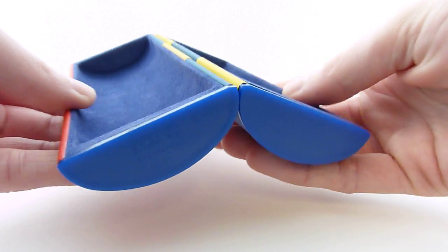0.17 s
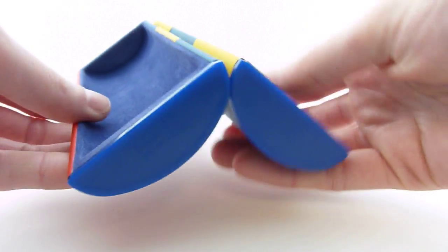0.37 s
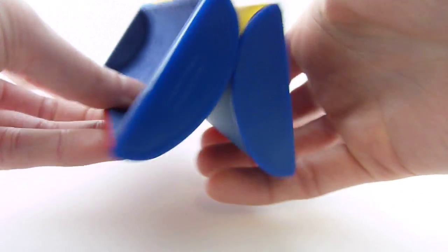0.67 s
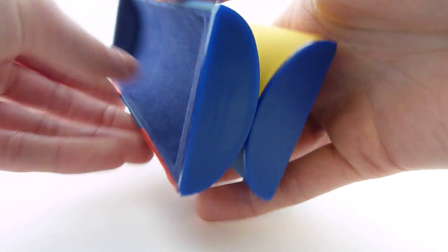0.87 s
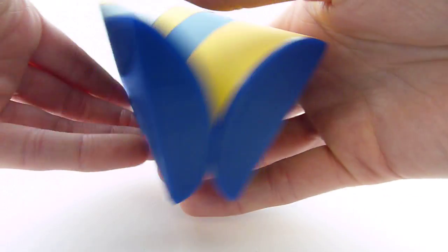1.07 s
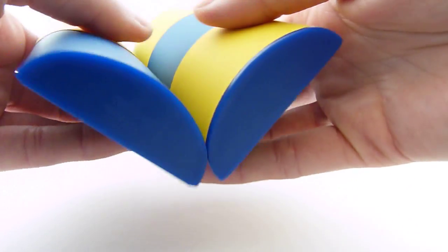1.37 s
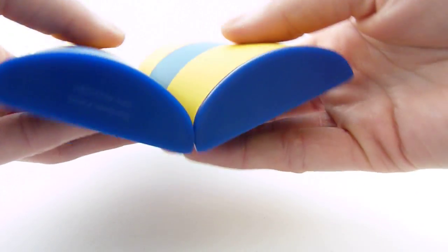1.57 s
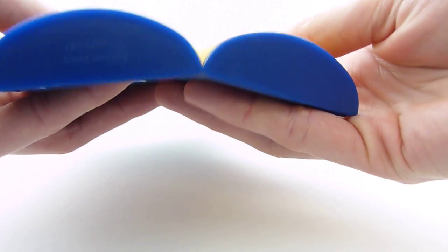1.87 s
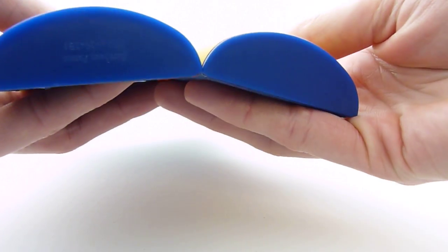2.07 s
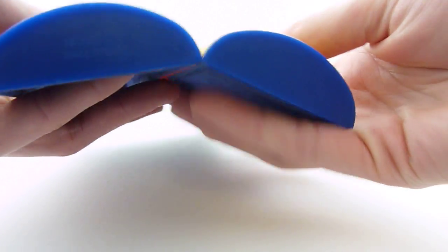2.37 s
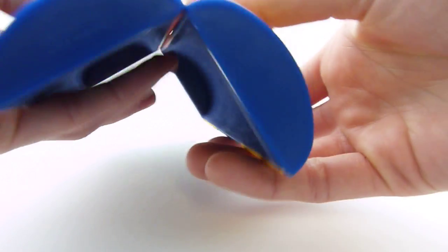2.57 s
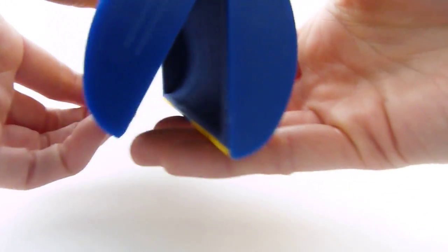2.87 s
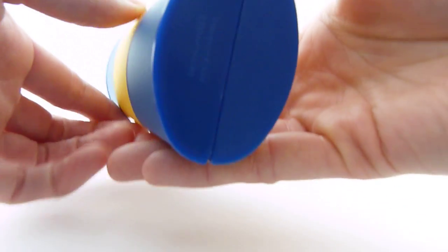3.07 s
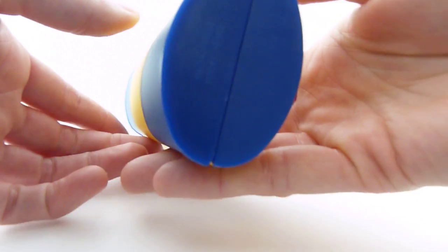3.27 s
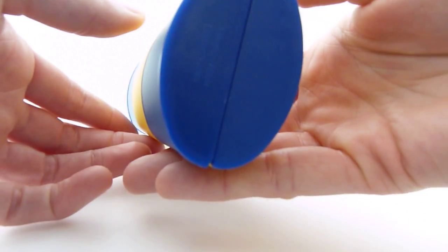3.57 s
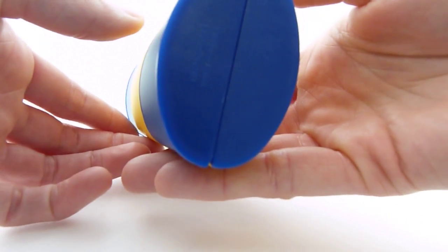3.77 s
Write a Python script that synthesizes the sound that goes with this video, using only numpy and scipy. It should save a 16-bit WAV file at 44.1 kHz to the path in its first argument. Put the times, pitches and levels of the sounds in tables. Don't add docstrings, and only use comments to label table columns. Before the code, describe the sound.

A plastic glasses case snaps shut, loud and close, after soft rubs and ticks over faint traffic rumble.

```python
import sys
import numpy as np
from scipy import signal
from scipy.fft import rfft, irfft
from scipy.io import wavfile

SR = 44100
rng = np.random.default_rng(int(sys.argv[2]) if len(sys.argv) > 2 else 0)


def digitize_waveform(pressure):
    field = np.atleast_2d(pressure).T
    bounded = np.clip(field, -1, 1)
    quanta = np.round(bounded * 32767).astype(np.int16)
    wavfile.write(sys.argv[1], SR, quanta)


def gain_from_db(level_db):
    decades = np.asarray(level_db, float) / 20
    return 10 ** decades


N = 172872

# time in seconds, peak level in dB.
SNAP_CONTACTS = [
    (3.0810, 2.5),
    (3.0825, -21),
    (3.0839, -16),
    (3.0868, -22.5),
]
SHUT_S = SNAP_CONTACTS[0][0]
KNOCK_S = 2.856


def at_hz(points, hz, column=1):
    p = np.array(points)
    return np.interp(np.log(np.maximum(hz, 1)), np.log(p[:, 0]), p[:, column])


def resonance(hz, centre_hz, width_hz):
    return 1 / (1 + ((hz - centre_hz) / width_hz * 2) ** 2)


def rms_one(x):
    return x / np.sqrt(np.mean(x ** 2) + 1e-20)


def drift(rate_hz):
    r = np.exp(-2 * np.pi * rate_hz / SR)
    noise = rng.standard_normal(N + SR)
    return rms_one(signal.lfilter([1], [1, -2 * r, r * r], noise)[SR:])


def ring(x, hz, t60):
    r = gain_from_db(-60 / (t60 * SR))
    w = 2 * np.pi * hz / SR
    return signal.lfilter([0, np.sin(w)], [1, -2 * r * np.cos(w), r * r], x + 1e-18)


def click(s, db):
    x = np.zeros(N)
    x[int(s * SR)] = gain_from_db(db)
    return x


def decay(s, t60):
    t = np.arange(N) / SR - s
    return (t >= 0) * gain_from_db(-60 * np.maximum(t, 0) / t60)


def swell(s, length):
    progress = np.clip((np.arange(N) / SR - s) / (1.3 * length), 0, 1)
    return np.sin(np.pi * progress ** .7) ** 2


def diffuse(gain_of_hz, size):
    # frequency in Hz, side against mid in dB.
    side_db = [(60, -11), (120, -29.5), (240, -25.5), (490, -23), (1000, -13), (2010, -6), (4060, -1),
               (8200, -3.5)]
    hz = np.fft.rfftfreq(size, 1 / SR)
    mid, side = rfft(rng.standard_normal((2, size))) * gain_of_hz(hz)
    side = side * gain_from_db(at_hz(side_db, hz))
    return irfft(np.array([mid + side, mid - side]), size)


def air():
    # frequency in Hz, density in dB per Hz.
    tone_db = [(22, -11.5), (36, -28), (60, 3.5), (130, 1.5), (330, -9.5), (1300, -18), (3300, -28.5),
               (7000, -42.5)]
    # frequency in Hz, width in Hz, boost in dB.
    humps = [(365, 20, 5.5), (625, 76, 6.5), (845, 27, 6), (1350, 300, 2), (6300, 1700, 6)]

    def colour(hz):
        boost = sum(db * resonance(hz, f, width) for f, width, db in humps)
        return gain_from_db(at_hz(tone_db, hz) + boost) * (hz > 12)

    return gain_from_db(-41) * rms_one(diffuse(colour, N))


def drones():
    # frequency in Hz, t60 of the ring in seconds, level in dB.
    resonances = [(54.6, 0.3, -47.5), (78.9, 0.45, -56), (95.6, 0.44, -63), (113.6, 0.55, -66.5),
                  (331.5, 0.13, -54.5)]
    out = 0
    for hz, t60, db in resonances:
        noise = rng.standard_normal(N + SR)
        hum = ring(ring(noise, hz, t60), hz, t60)[SR:]
        out = out + gain_from_db(db) * rms_one(hum)
    return out


def engine():
    # time in seconds, firing rate in Hz, level in dB.
    pull = [(1.3, 62, -38.5), (1.45, 65.3, -35.5), (1.55, 70.5, -31), (1.68, 73.4, -49), (1.93, 77.7, -33),
            (2.2, 84.8, -37), (2.43, 85.9, -34.5), (2.6, 84.6, -43), (2.7, 93.8, -66)]
    cruise = [(2.402, 76, -51.5), (2.552, 69.1, -35.5), (2.76, 67.1, -33), (3.001, 67.77, -30.5),
              (3.25, 70.4, -34), (3.44, 66.7, -35.5), (3.52, 63.3, -66)]
    # multiple of the firing rate, level in dB.
    orders = [(1, -2.5), (2, -17.5), (4, -19.5)]
    out, t = 0, np.arange(N) / SR
    for rows in (pull, cruise):
        s, hz, db = np.transpose(rows)
        phase = 2 * np.pi * np.cumsum(np.interp(t, s, hz)) / SR
        for order, order_db in orders:
            level_db = np.interp(t, s, db) + order_db + 1.5 * drift(6.0)
            out = out + np.sqrt(2) * gain_from_db(level_db) * np.sin(order * phase)
    return out


def room(x):
    # frequency in Hz, t60 in seconds, level in dB.
    bands = [(343, 0.58, -41.5), (606, 0.97, -49), (863, 0.54, -33), (1370, 0.69, -29), (2170, 0.6, -33.5),
             (3380, 0.74, -42), (5200, 0.83, -47.5), (6460, 0.61, -54)]
    size, rise_s = SR, 0.0044
    response, t = 0, np.arange(size) / SR
    build_up = 1 - np.exp(-(t / rise_s) ** 2)
    for hz, t60, db in bands:
        band = rms_one(diffuse(lambda f: np.exp(-(np.log2(np.maximum(f, 1) / hz) / .4) ** 2), size))
        response = response + gain_from_db(db - 60 * t / t60) * band * build_up
    return signal.fftconvolve(x[None], response, axes=1)[:, :N]


def rubs():
    # start in seconds, length in seconds, level in dB.
    slides = [(.2, 0.082, -65), (1.017, 0.038, -62), (1.133, 0.074, -60.5), (1.27, 0.12, -63),
              (1.482, 0.14, -52), (1.572, 0.16, -56), (1.718, 0.086, -60.5), (2.313, 0.2, -54.5),
              (2.471, 0.17, -55.5), (2.57, 0.21, -59)]
    # start in seconds, length in seconds, frequency in Hz, level in dB.
    squeaks = [
        (0.692, 0.033, 3450, -59),
        (1.265, .07, 3450, -60.5),
    ]
    hiss = rms_one(diffuse(lambda hz: resonance(hz, 6700, 2200) + gain_from_db(-4) * resonance(hz, 3300, 3000), N))
    grain = gain_from_db(1.5 * drift(60.0))
    out = hiss * grain * sum(gain_from_db(db) * swell(s, length) for s, length, db in slides)
    for s, length, hz, db in squeaks:
        squeal = rms_one(ring(rng.standard_normal(N), hz, 0.013))
        out = out + gain_from_db(db) * swell(s, length) * squeal
    return out


def ticks():
    # time in seconds, peak in dB, ring in Hz, ring t60 in seconds, crack level in dB.
    slips = [
        (.452, -51, 7500, .006, -42.5),
        (0.863, -33, 2230, 0.031, -41),
        (1.169, -63, 3300, 0.0092, -52),
        (1.788, -56, 6500, 0.0083, -62),
        (2.859, -29, 3350, 0.01, -35),
    ]
    out = np.zeros((2, N))
    for s, db, hz, t60, crack_db in slips:
        tone = ring(click(s, db), hz, t60)
        crack = decay(s, .025) * rng.standard_normal((2, N))
        out += np.array([tone, np.roll(tone, 3)])
        out += gain_from_db(crack_db) * crack
    return out


def knock():
    # frequency in Hz, level in dB.
    colour_db = [(150, -22), (320, 1), (600, 5), (950, 2), (1600, -6), (3300, -10.5), (5000, -10.5),
                 (7500, -22)]
    rise_s, t60 = .002, 0.51
    burst = rms_one(diffuse(lambda hz: gain_from_db(at_hz(colour_db, hz)) * (hz > 90), N))
    rise = np.clip((np.arange(N) / SR - KNOCK_S) / rise_s, 0, 1)
    grain = gain_from_db(2.4 * drift(150))
    return gain_from_db(-33) * rise * burst * grain * decay(KNOCK_S, t60)


def snap():
    # frequency in Hz, level in dB, t60 in seconds.
    modes = [(331, -5, 0.01), (493, 1.5, 0.0065), (757, 1.5, 0.009), (908, -11, 0.029), (1098, -7, .015),
             (1262, -11.5, 0.022), (1635, -17, 0.045), (2040, -8.5, .013), (2495, -15.5, 0.021),
             (3253, -6.5, 0.0069), (3810, -17.5, .01), (5340, -22, .008), (5600, -8.5, .008),
             (6900, -22.5, .008)]
    out = np.zeros((2, N))
    for hz, db, t60 in modes:
        for side in range(2):
            lag_s = side * .00007 * (hz > 1000)
            blows = sum(click(s + lag_s, hit_db + db) for s, hit_db in SNAP_CONTACTS)
            out[side] += ring(blows, hz, t60)
    t = np.arange(N) / SR - SHUT_S
    suck_s = .0008
    out = out - gain_from_db(-4) * np.exp(np.minimum(t, 0) / suck_s) * (t < 0)
    out = signal.sosfiltfilt(signal.butter(1, 160, "high", fs=SR, output="sos"), out)
    crack = rms_one(diffuse(lambda hz: (hz > 1500) / np.sqrt(np.maximum(hz, 1)), N))
    out = out + gain_from_db(-15) * decay(SHUT_S, .024) * crack
    return signal.sosfilt(signal.butter(4, 7400, fs=SR, output="sos"), out)


def scene():
    shut = snap()
    blows = click(SHUT_S, 3.5) + click(KNOCK_S, -13.5)
    wet = room(gain_from_db(-28) * shut.mean(0) + blows)
    duck_db, recovery_s = -9, .07
    duck = gain_from_db(duck_db * decay(SHUT_S, recovery_s * np.log(1000)))
    background = air() + engine() + drones() + wet
    return shut + knock() + ticks() + rubs() + duck * background


def top_cut(x):
    return signal.sosfilt(signal.butter(12, 8800, fs=SR, output="sos"), x)


def record(dry):
    # frequency in Hz, width in Hz.
    notches = [(2600, 700), (4600, 650), (5420, 400), (7900, 380), (8105, 300)]
    x = dry
    for hz, width in notches:
        x = signal.lfilter(*signal.iirnotch(hz, hz / width, SR), x)
    top_hz = 7850
    low = signal.sosfilt(signal.butter(8, top_hz, "low", fs=SR, output="sos"), x)
    high = signal.sosfilt(signal.butter(8, top_hz, "high", fs=SR, output="sos"), x)
    whine = ring(dry, 8002, .1)
    x = low + gain_from_db(-16) * high + gain_from_db(-51) * whine
    x = signal.sosfiltfilt(signal.butter(13, 8600, fs=SR, output="sos"), x)
    x = np.clip(x, -1.02, 1.02)
    x = signal.sosfiltfilt(signal.butter(14, 16000, fs=SR, output="sos"), x)
    return top_cut(np.clip(x, -1, 1))


dry = scene()
out = record(dry)
digitize_waveform(out)
```